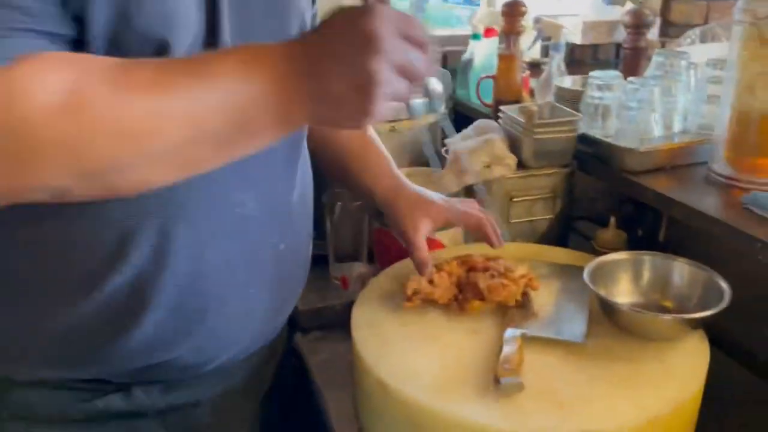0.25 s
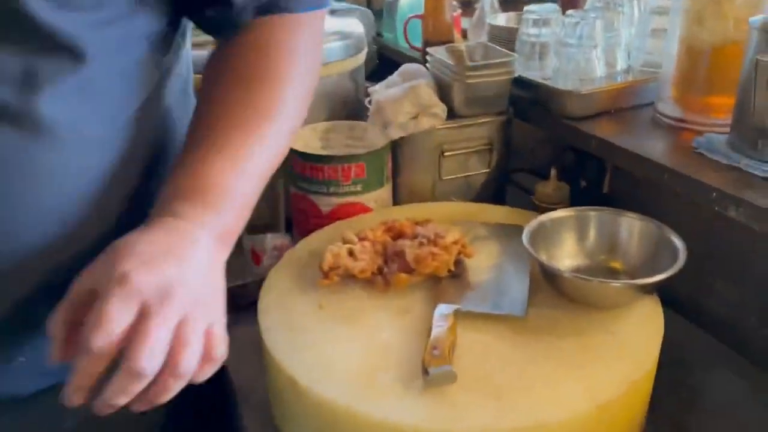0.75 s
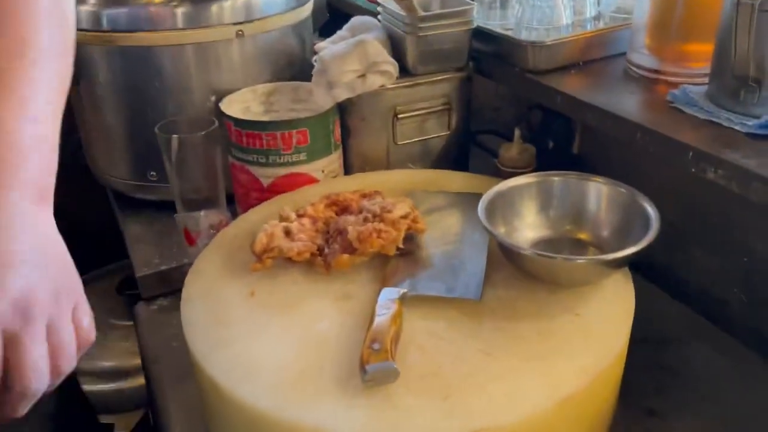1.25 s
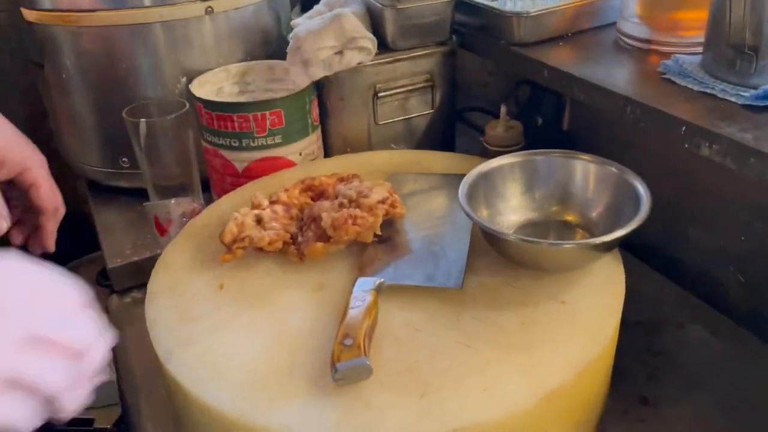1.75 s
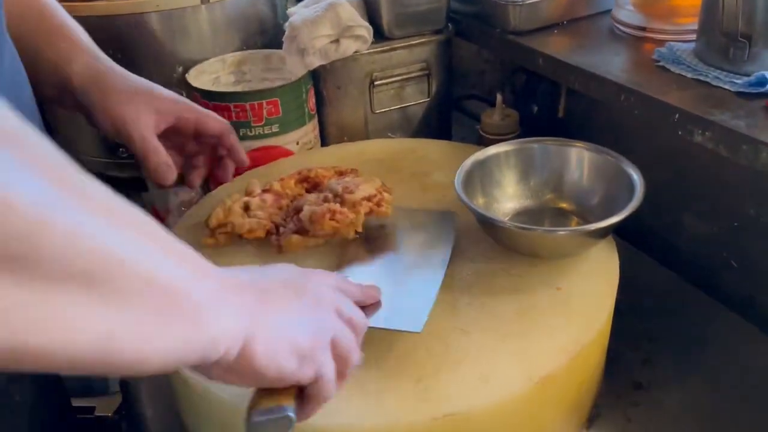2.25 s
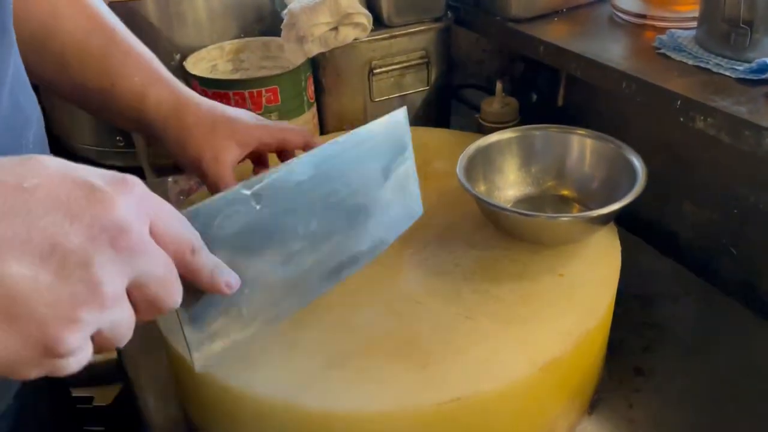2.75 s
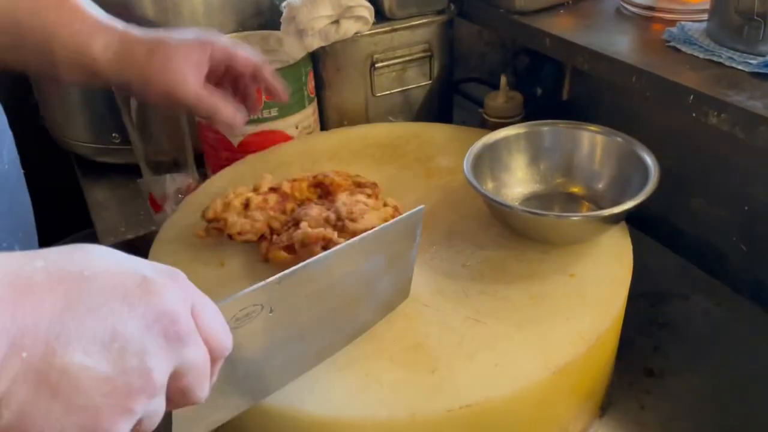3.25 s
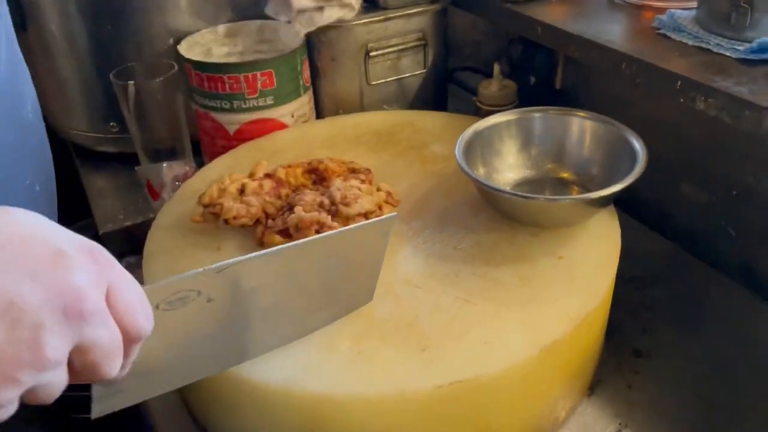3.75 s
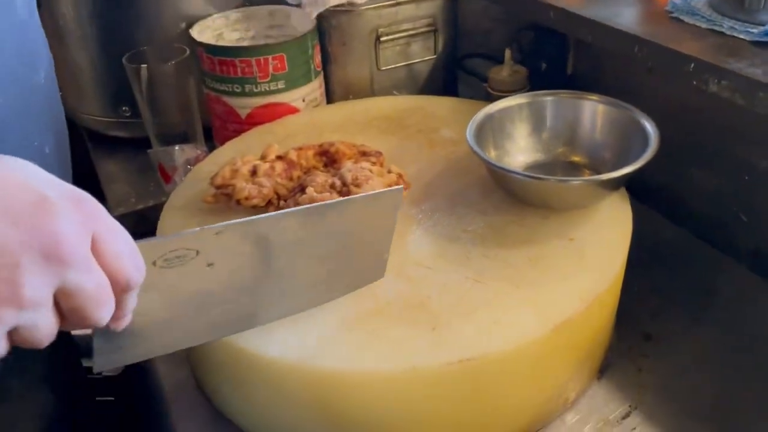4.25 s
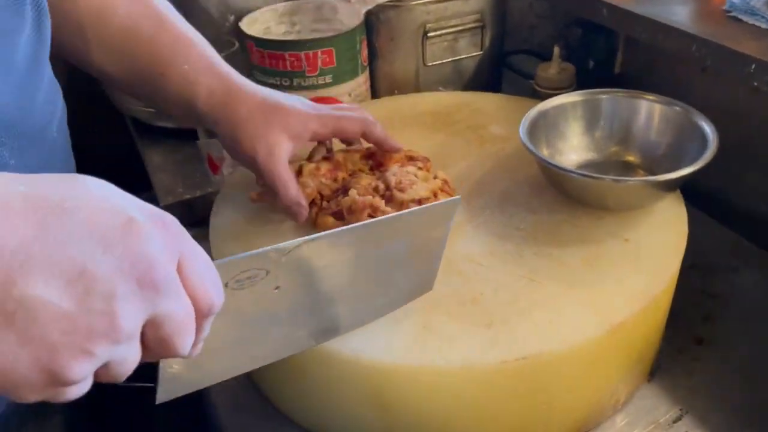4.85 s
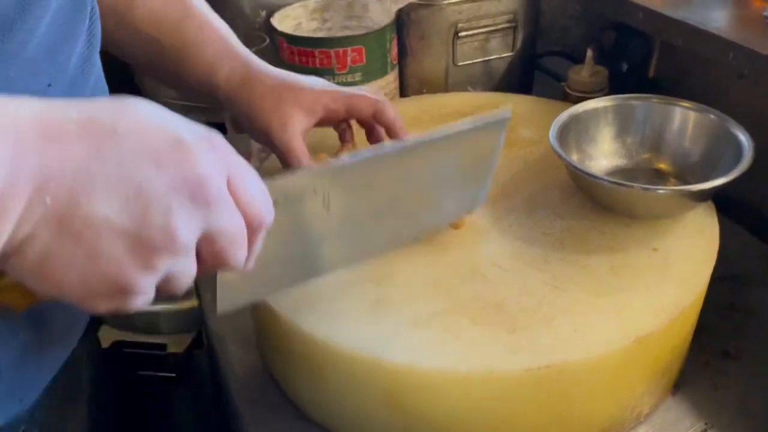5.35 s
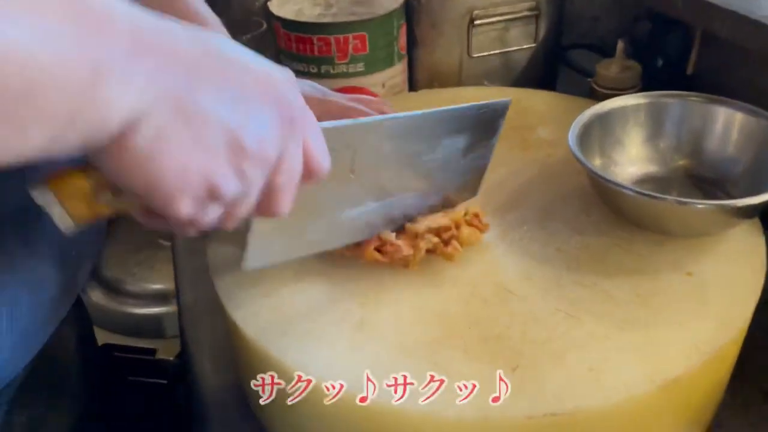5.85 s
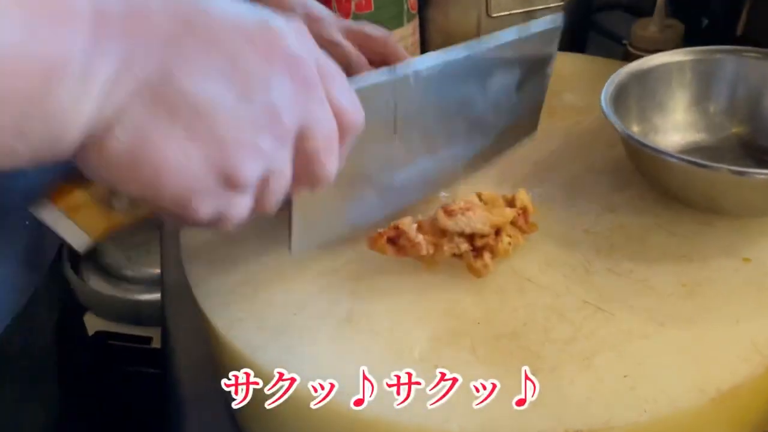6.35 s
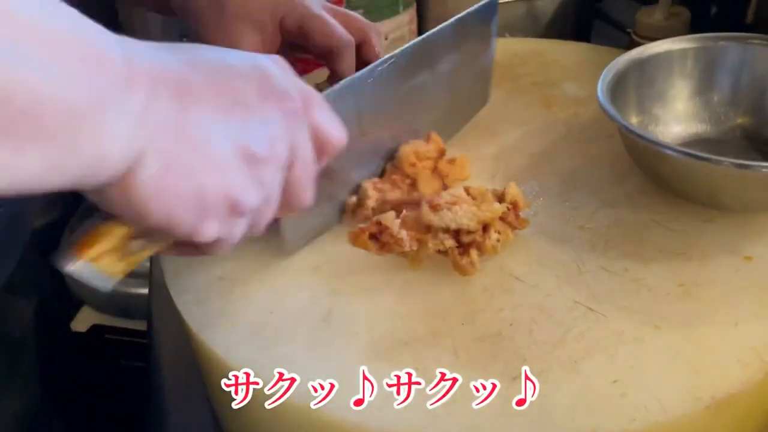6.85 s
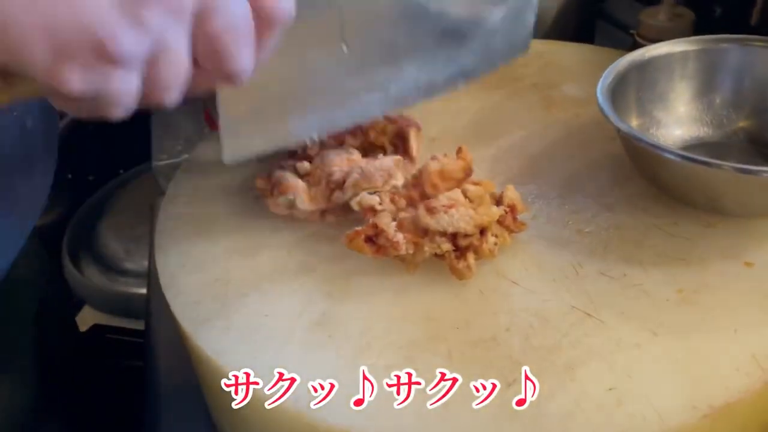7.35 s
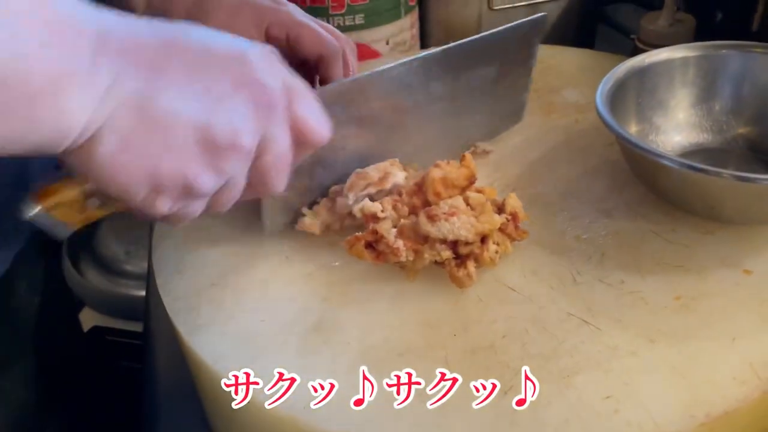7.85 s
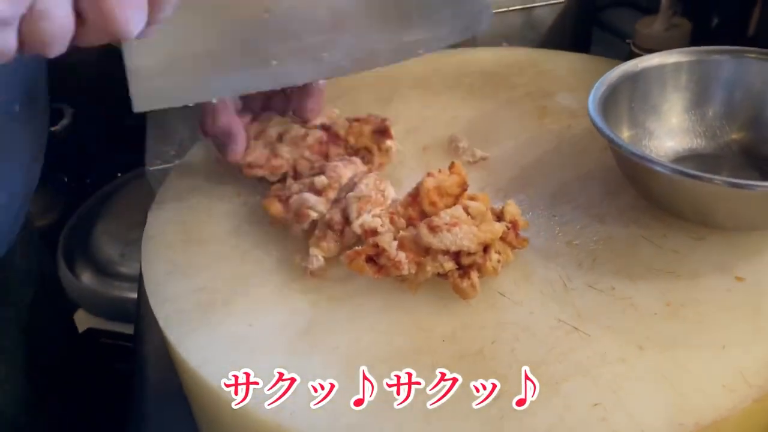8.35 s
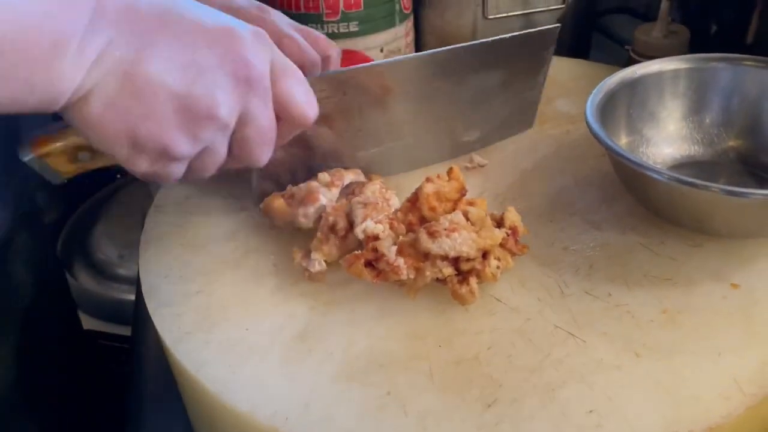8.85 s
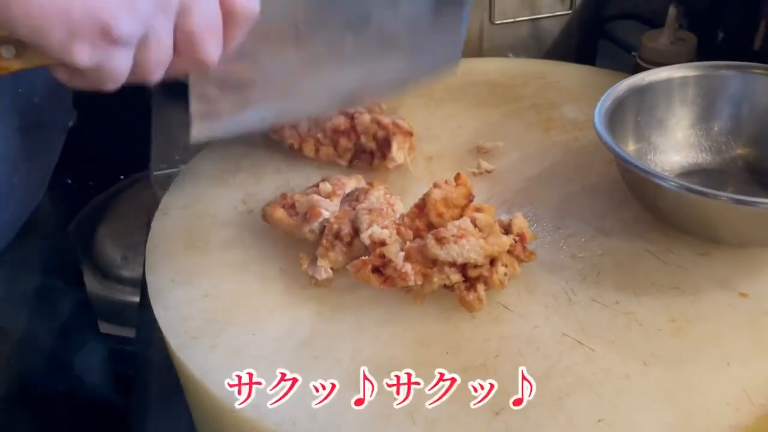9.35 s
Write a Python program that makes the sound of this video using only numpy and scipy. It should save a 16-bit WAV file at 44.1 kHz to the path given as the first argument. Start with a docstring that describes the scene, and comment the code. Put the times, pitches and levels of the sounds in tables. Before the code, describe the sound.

A heavy cleaver scrapes and rings, knocks a thick wooden block, then crunches five times through crisp fried chicken over a humming kitchen fan.

```python
"""A heavy cleaver slides ringing over a thick wooden block and taps it, twice firmly and then more softly.
It is laid on crisp fried chicken and pressed through five times: decaying modes and noise make the
blows, shaped grains of noise the crackling crust. In the kitchen behind, a fan hums (two wavering sines)
over rushing air, frying hiss (filtered noise) and far clatter. Two close microphone ports hear it all."""
import sys
import numpy as np
from scipy import signal
from scipy.fft import rfft, irfft
from scipy.io import wavfile
from scipy.ndimage import uniform_filter1d

SR = 44100
rng = np.random.default_rng(int(sys.argv[2]) if len(sys.argv) > 2 else 0)


def elevation(decibels):
    """Turn decibel levels (scalar or array-like) into linear amplitude ratios."""
    levels = np.asarray(decibels, float)
    return 10 ** (levels / 20)


def int16_out(signal):
    """Quantize to a 16-bit WAV file."""
    q = np.round(np.clip(np.atleast_2d(signal).T, -1, 1) * 32767)
    wavfile.write(sys.argv[1], SR, q.astype(np.int16))


N = 423360  # samples

# Close: cleaver knocks on the block, bare or through the meat
# [t/s, level/dB, contact/ms, steel ring re knock/dB]
KNOCKS = [(2.214, -29.5, 0.81, 20), (2.9194, -8, 0.13, -6), (3.132, -6, 0.16, -3.5), (3.146, -25.5, .15, 5),
          (4.271, -24, 0.11, -11), (5.1488, -23, 0.37, -8), (5.9051, -15, 0.57, -3),
          (5.9105, -21, 1.16, -4), (6.83, -17.5, 0.45, 0.5), (6.8336, -8, 0.76, -6), (7.789, -22, 1.2, -6),
          (8.717, -21, 1.03, -6), (9.367, -35, 0.81, 2)]
# Close: the free blade is touched and rings, most in the modes near f
# [t/s, ring level/dB, edge snap level/dB, contact/ms, f/Hz]
TOUCHES = [(2.192, -34, -45, 0.061, 6000), (2.198, -40, -40, .05, 13900), (2.2150, -15.5, -46, 0.55, 1440),
           (2.2582, -29, -36, 0.055, 7300), (2.262, -39, -45, 0.061, 11600),
           (2.3195, -20.5, -16, 0.042, 12500), (2.333, -29, -31, 0.054, 5600), (2.352, -22, -44, 0.2, 2330),
           (2.378, -32, -40, 0.08, 12300), (2.379, -30, -45, 0.13, 4900), (2.398, -33, -46, 0.12, 4760),
           (2.42, -43, -44, 0.065, 12300), (2.436, -36, -47, .06, 9330), (9.367, -23.5, -26, 0.31, 1450)]
# Modes of the block, of the steel resting on it, of the blade hanging free [f/Hz, relative level/dB, t60/s]
BLOCK_MODES = [(100.4, 0, 0.31), (141, -3.5, 0.14), (177, -7, 0.22), (239, 6, 0.12), (304, 5, 0.22),
               (381, -7, 0.3), (430, 2, 0.14), (470, 5, 0.13), (549, -5, 0.24), (602, -8, 0.15),
               (703, -8, 0.044), (1060, -3, 0.023), (1423, -1, 0.034), (2000, -5, 0.016)]
STEEL_MODES = [(784, -12, 0.11), (910, -2, 0.12), (1208, 3.5, 0.062), (1274, 9, 0.054), (1424, 1, 0.067),
               (2000, -14, .06), (2300, -15, .06), (3110, 4, 0.067), (3540, -1, 0.059), (3800, -13, .06),
               (4440, -16, .06), (4700, -7, 0.049)]
BLADE_MODES = [(1443, 2.5, 0.1), (1700, -4, 0.15), (2327, -11, .12), (2740, -5, 0.07), (3570, -6, 0.063),
               (4760, -9, 0.092), (5150, -6, 0.06), (5560, -10, 0.061), (6240, -6.5, 0.24),
               (6600, -11, .07), (7250, -10, .07), (7700, -5, .07), (9330, -10, 0.1), (10860, -10, 0.08),
               (11600, -14, .08), (12300, -8, 0.09), (12500, -3, 0.055), (13870, -6, .08),
               (14600, -10, .07), (15560, -8, .05)]
# Spectra of the dense wooden thud, the crack that opens a blow, the snap of the edge [f/Hz, level/dB]
THUD_COLOUR = [(30, -25), (60, -7), (150, 0.5), (400, -2.5), (800, -12), (1700, -20), (3500, -28),
               (6000, -40)]
CRACK_COLOUR = [(100, -20), (400, 2.5), (1300, 12.5), (2500, 5.5), (5000, -23), (8000, -28)]
SNAP_COLOUR = [(1000, 0.5), (4000, 1.5), (7000, 0), (9000, 15), (12000, -7), (16000, -1)]
BLADE_SPOT_DB = 3  # how much the blade modes differ from touch to touch
FAVOUR_DB, FAVOUR_OCTAVES = 10, 0.19  # lift of the modes near the touched f, and its reach
THUD_DB, THUD_T60_S = -0.5, 0.11  # t60 before damping
BLOW_HZ, BLOW_DB, BLOW_T60_S = 269, -7, 0.041  # first swing of the whole block, t60 before damping
MEAT_DAMPING = 0.54  # extra fall per ms of contact
CRACK_DB, CRACK_T60_S = 2, 0.019  # level before softening by contact
CRACK_RISE, CRACK_CONTACT = 0.74, 0.52  # both in contact times
SNAP_DB, SNAP_DB_PER_MS, SNAP_FALL_MS = -10.5, -36, 3.7  # re knock; weaker for longer contact; fall to 1/e

# Close: the edge is laid on the crust [t/s, level/dB, rise/s, hold/s, treble/dB]
LAYS = [(5.637, -21, 0.006, 0.011, 1.5), (6.558, -17, 0.0075, 0.0096, 4),
        (7.512, -16.5, 0.011, 0.0058, 3.5), (8.439, -24, 0.0038, 0.02, 6), (9.357, -25, 0.0062, 0.021, 10)]
# Close: the edge is pressed through the piece [t/s, level/dB, rise/s, hold/s, treble/dB]
PRESSES = [(5.822, -25.5, 0.06, 0.042, 1), (6.751, -25, 0.0034, 0.074, 7.5),
           (7.703, -24.5, 0.063, 0.017, 6.5), (8.665, -23.5, 0.026, 0.036, 3.5),
           (9.533, -35, 0.007, 0.046, 7)]
# Spectrum of breaking crust, also used for the rustles and drag [f/Hz, level/dB]
CRUST_COLOUR = [(150, -20), (500, 2), (1000, 1.5), (2200, 1), (4000, -2.5), (6500, -4.5), (7600, -0.5),
                (9000, 0.5), (10500, -6), (13000, -11), (16000, -10)]
LAY_T60_S, PRESS_T60_S = 0.017, 0.063
SETTLE_T60_S, SETTLE_DB = 0.16, -13  # the crust goes on settling, more quietly
CRUST_PATCHY_DB = 2  # each half octave of the crackle swells on its own

# Close: thick bits of crust crack at their own pitch [t/s, level/dB, f/Hz]
CHUNKS = [(5.849, -30, 4200), (5.8635, -19, 4250), (5.8723, -18, 2530), (5.874, -18, 4000),
          (5.882, -15, 2800), (5.8827, -16, 4000), (5.891, -22, 2700), (5.926, -23, 4100),
          (6.7605, -30, 4560), (6.764, -20, 6800), (6.786, -22, 3800), (6.799, -21, 2300),
          (6.807, -21, 2580), (6.823, -19, 6700), (7.7113, -28, 6800), (7.735, -27, 3600),
          (7.757, -22, 2520), (7.765, -26, 6300), (7.771, -18, 4800), (7.776, -14, 3380),
          (7.782, -28, 1480), (8.694, -26, 3540), (8.705, -27, 2500), (8.7255, -24, 4500)]
CHUNK_CYCLES = 5.6  # cycles to fade to 1/e
SMALL_CHUNK_DB, SMALL_LOW_HZ, SMALL_HIGH_HZ = -4, 1303, 7300  # highest level re the press; pitch range
# Close: clearest single flakes of crust snapping [t/s, level/dB]
FLAKES = [(5.646, -36), (5.7026, -32), (5.8135, -30), (5.872, -19), (6.095, -23.5), (6.4823, -30),
          (6.516, -25), (6.5633, -11), (6.7603, -31), (6.808, -24), (6.859, -26), (7.108, -27),
          (7.3216, -29), (7.508, -24), (7.5212, -19), (7.7345, -23), (7.9142, -22.5), (7.959, -28),
          (8.0647, -32), (8.2381, -27), (8.311, -24), (8.351, -21), (8.4, -24), (8.4435, -21),
          (8.4556, -12), (8.68, -23), (8.694, -22), (8.705, -17), (8.7255, -26), (8.981, -25), (9.241, -26),
          (9.27, -23), (9.3664, -17)]
# Thin flakes are brighter than the crust [f/Hz, level/dB]
FLAKE_TREBLE = [(3000, -3), (7000, 2), (11000, 2)]
FLAKE_T60_S, FAINT_FLAKE_DB = 0.032, -32

# The cleaver slides over the wood
DRAG_S, DRAG_DB, DRAG_HOLD_S, DRAG_T60_S = 2.18, -43, 0.2, 0.62
SCRAPE_DB, SCRAPE_PATCHY_DB = -24.5, 4  # each mode sings and falls silent on its own
# Out of sight: rustles, most of them bright [t/s, level/dB, t60/s, treble/dB, treble from f/Hz]
RUSTLES = [(.945, -40.5, 0.02, 16, 5030), (1.003, -23.5, 0.37, 6.5, 4970), (1.367, -43, 0.025, 13, 6500),
           (1.705, -48, .02, 12, 6500), (1.762, -45, .02, 14, 6000), (2.745, -50, 0.17, 18, 5030),
           (4.267, -17.5, 0.11, -11, 2700)]
RUSTLE_RISE_S, RUSTLE_HOLD_S = 0.0005, 0.0015

# Freshly cut chicken: spectrum of the sizzle [f/Hz, level/dB], then its course [t/s, level/dB]
SIZZLE_COLOUR = [(2000, -15), (4000, 0.5), (5500, -6), (6800, 4), (7800, 4), (9000, -1.5), (11000, -3.5),
                 (13500, 3), (16000, 0)]
SIZZLE_COURSE = [(5.64, -40), (5.78, -51), (5.9, -31), (6.0, -41.5), (6.35, -39.5), (6.58, -46),
                 (6.72, -39.5), (7.25, -48), (7.56, -48), (7.88, -39), (8.2, -39.5), (8.53, -36.5),
                 (8.87, -37), (9.1, -41), (9.45, -43), (9.6, -37)]
# Far: clearest clinks of pans and dishes; the row at 2.7 s is a light touch of the cleaver, ringing the same
# way [t/s, level/dB, f/Hz]
CLINKS = [(.059, -31.5, 3880), (0.238, -34.5, 3900), (0.4288, -35, 2000), (0.583, -31, 4060),
          (0.639, -27.5, 2505), (0.639, -33.5, 3830), (1.23, -35.5, 3030), (1.467, -31, 1716),
          (1.68, -30.5, 2000), (2.107, -30.5, 1740), (2.7, -28, 1724), (3.6802, -34, 3620),
          (3.8575, -34, 2540), (4.708, -36.5, 3870), (4.8313, -32.5, 2090), (6.095, -42, 2200),
          (6.135, -38, 1870), (6.176, -32.5, 3800), (9.2566, -32, 2680)]
CLINK_T60_S, FAINT_CLINK_DB, FAINT_LOW_HZ, FAINT_HIGH_HZ = 0.19, -39, 1650, 4400
CLINK_TICK, CLINK_TICK_S = 1, 0.0037  # clear start of a clink

# Fan: crest of its hum [t/s, blade tone level/dB, octave level/dB]
HUM_CREST = [(0.0, -22, -51), (0.4, -25.5, -30), (0.85, -22.5, -36), (0.99, -32, -25.5), (1.2, -27, -37.5),
             (2.38, -20.5, -28.5), (2.51, -30, -28.5), (3.77, -27.5, -35), (4.36, -24.5, -30),
             (4.41, -28.5, -44.5), (5.11, -23, -29), (5.48, -22.5, -36), (5.75, -29, -27.5),
             (6.71, -30.5, -45.5), (7.19, -23, -24.5), (7.27, -26, -49), (7.38, -27.5, -28),
             (9.41, -25.5, -34), (9.55, -25, -23.5), (9.6, -40, -52)]
HUM_HZ, HUM_DIP_DB, OCTAVE_DIP_DB = 66.57, 4, 2
HUM_LEFT_DB, HUM_RIGHT_LATE_S = 2, .0004  # left port over right port

# Spectra of the rumble, rushing air, far clatter and frying hiss [f/Hz, level/dB]
RUMBLE_COLOUR = [(20, -40), (45, -5.5), (60, -13.5), (100, 3), (170, -3), (260, -6), (400, -14.5),
                 (700, -32.5), (1500, -69)]
RUSH_COLOUR = [(80, -31), (300, -12.5), (450, 0.5), (700, -7), (1000, -8.5), (1500, -14), (2500, -21),
               (6000, -42)]
CLATTER_COLOUR = [(500, -7.5), (1500, 1.5), (2500, 1), (4000, -2), (5500, -12), (8000, -69)]
HISS_COLOUR = [(2000, -15), (4000, -8), (5500, -4.5), (6800, 3), (7800, 8), (9000, 5.5), (11000, -1.5),
               (13000, 1), (16000, 0.5)]
RUMBLE_DB, CLATTER_DB, HISS_DB = -29, -43, -50
RUSH_DB, RUSH_SHARE, RUSH_RISE_DB_PER_S = -34, 0.19, 0.2281
# Kitchen activity, followed fully by the clatter and in part by the rush [t/s, level/dB]
BUSY = [(0, 9), (.6, 3.5), (1.95, 3.5), (2.3, 5.5), (2.8, 3.5), (3.05, 5), (3.22, -1.5), (3.4, 3.5),
        (3.9, 3.5), (4.6, 1.5), (5.6, 0.5), (6.0, 6.5), (6.6, 0), (6.8, 6.5), (7.5, -0.5), (7.9, 3.5),
        (9.4, 0), (9.6, 2.5)]
# Far: the rush swells in a narrow band [middle t/s, length/s, centre f/Hz, level/dB]
SWELLS = [(3.693, 0.58, 650, -34), (4, 0.46, 633, -33), (6.0, 1, 875, -40), (9.007, 0.63, 901, -33),
          (9.191, 0.053, 910, -30)]
SWELL_WIDTH = 0.25  # share of the centre

# Ports: sound reaching each by its own path, re the shared sound [f/Hz, level/dB]
APART = [(60, -34), (130, -2.5), (300, 2), (700, 11), (1400, 6), (3000, 5.5), (6000, 8), (7600, -4.5),
         (8300, -12), (9800, -1.5), (11000, 1.5), (16000, -27)]
# Right port: phase lag of the shared sound behind the left [f/Hz, lag/rad]
PORT_LAG = [(0, .15), (430, 0), (700, .9), (1900, .1), (3100, 1.2), (4500, .7), (6400, -.6), (6750, -.6),
            (7700, -3), (10100, -3.3), (11200, -5), (11800, -6.1), (12800, -6.28), (17000, -6.28)]
# Right port: its response against the left [f/Hz, level/dB]
RIGHT = [(60, -2), (300, -3), (1500, -1.8), (5000, -.5), (8000, 0), (16000, 0)]
TAIL_T60_S, TAIL_DB = 0.094, -11  # room tail
WIDE_DB = -7  # sound bending round the housing
TOP_HZ = 15900


def blows():
    """The block rings, thuds and cracks, damped by the meat; the free blade rings on."""
    out, t = np.zeros(N), np.arange(SR // 2) / SR
    swing = elevation(BLOW_DB - 60 * t / BLOW_T60_S) * np.sin(2 * np.pi * BLOW_HZ * t)
    for s, db, contact_ms, steel_db in KNOCKS:
        thud = unit(colour(rng.standard_normal(len(t)), THUD_COLOUR)) * elevation(THUD_DB - 60 * t / THUD_T60_S)
        crack = unit(colour(rng.standard_normal(len(t)), CRACK_COLOUR))
        crack = crack * elevation(CRACK_DB - 60 * t / CRACK_T60_S)
        damping_db = 60 * t * MEAT_DAMPING * contact_ms / THUD_T60_S
        wood = (ring(BLOCK_MODES, t) + thud - swing) * elevation(db - damping_db)
        # a long contact damps the steel more strongly still
        steel = elevation(db + steel_db - damping_db * contact_ms) * ring(STEEL_MODES, t)
        strike(out, s, wood + steel, contact_ms)
        rise = np.minimum(t / (CRACK_RISE * contact_ms / 1000), 1)
        crack = elevation(db) * crack * rise / (1 + 2.3 * contact_ms)
        snap_db = db + SNAP_DB + SNAP_DB_PER_MS * contact_ms
        strike(out, s, crack, CRACK_CONTACT * contact_ms, snap_db)
    for s, db, snap_db, contact_ms, near_hz in TOUCHES:
        modes = []
        for hz, own_db, t60 in BLADE_MODES:
            nearness = np.exp(-(np.log2(hz / near_hz) / FAVOUR_OCTAVES) ** 2)
            modes.append((hz, own_db + FAVOUR_DB * nearness, t60))
        strike(out, s, elevation(db) * ring(modes, t, BLADE_SPOT_DB), contact_ms, snap_db)
    return out


def strike(out, s, body, contact_ms, snap_db=-np.inf):
    """A softer contact is a longer push and sounds duller; the edge snaps."""
    t = np.arange(400) / SR
    push = np.exp(-.5 * ((t * 1000 / contact_ms - 1) / 0.3) ** 2)
    add(out, s, np.convolve(body, push / push.sum()))
    snap = colour(rng.standard_normal(len(t)), SNAP_COLOUR) * np.exp(-t * 1000 / SNAP_FALL_MS)
    add(out, s, elevation(snap_db) * snap)


def ring(modes, t, spot_db=1.2):
    """All modes of a body struck once; each spot excites them a little differently."""
    hz, db, t60 = np.transpose(modes)[:, :, None]
    spread = np.array([spot_db, .004, .3])[:, None, None]  # level/dB, share of pitch, phase/rad
    level, detune, phase = rng.standard_normal((3, len(modes), 1)) * spread
    sign = (-1) ** np.arange(len(modes))[:, None]
    tones = np.sin(2 * np.pi * hz * (1 + detune) * t + phase)
    return np.sum(sign * elevation(db + level - 60 * t / t60) * tones, axis=0) / 3


def cuts(crust):
    """Crust breaks briefly as the edge is laid on, longer as it is pressed through."""
    crust = unit(swelling_bands(crust, 2, 1000, 8, CRUST_PATCHY_DB, 70))
    breaks = []
    for s, db, rise, hold, treble_db in LAYS:
        breaks.append((s, rise, hold, LAY_T60_S, db, treble_db))
        breaks.append((s, rise, hold, SETTLE_T60_S, db + SETTLE_DB, treble_db))
    for s, db, rise, hold, treble_db in PRESSES:
        breaks.append((s, rise, hold, PRESS_T60_S, db, treble_db))
    return bursts(breaks, crust)


def bursts(table, crackle, treble_hz=5000):
    """Crackle shaped by rise, hold and fall, its treble set apart; thinner flakes add treble."""
    out, t = np.zeros(N), np.arange(SR // 2) / SR
    high = colour(crackle, [(treble_hz, -40), (1.6 * treble_hz, 0)])
    low = crackle - high
    for s, rise, hold, t60, db, treble_db in table:
        shape = np.minimum(t / rise, 1) * elevation(db - 60 * np.maximum(t - rise - hold, 0) / t60)
        i = min(int(s * SR), N - len(t))
        add(out, s, shape * (low + elevation(treble_db) * high)[i:i + len(t)])
    return out


def chunks(count=16):
    """Thick crust cracks in short rough rings; smaller ones break at random under each press."""
    out, t = np.zeros(N), np.arange(600) / SR
    small = []
    for s, db, rise, hold, _ in PRESSES:
        for a, b, c in rng.random((count, 3)):
            when = s + a ** .6 * (rise + hold + PRESS_T60_S / 4)
            pitch = SMALL_LOW_HZ * (SMALL_HIGH_HZ / SMALL_LOW_HZ) ** c
            small.append((when, db + SMALL_CHUNK_DB - 9 * b, pitch))
    for s, db, hz in CHUNKS + small:
        rough = 1 + 1.7 * uniform_filter1d(rng.standard_normal(len(t)), size=20)
        add(out, s, elevation(db) * rough * np.sin(2 * np.pi * hz * t) * np.exp(-t * hz / CHUNK_CYCLES))
    return out


def flakes(count=14):
    """Brief snaps in a brightened crust colour; fainter ones at random once cutting has begun."""
    out, t = np.zeros(N), np.arange(1200) / SR
    start = LAYS[0][0]
    faint = [(start + a * (N / SR - start), FAINT_FLAKE_DB - 6 * b) for a, b in rng.random((count, 2))]
    for s, db in FLAKES + faint:
        add(out, s, rng.standard_normal(len(t)) * elevation(db - 60 * t / FLAKE_T60_S))
    return colour(colour(out, CRUST_COLOUR), FLAKE_TREBLE)


def singing(drag):
    """Dragging the cleaver over the wood keeps its modes singing, now one, now another."""
    t, i = np.arange(SR // 4) / SR, slice(int(DRAG_S * SR), int(DRAG_S * SR) + SR // 2)
    out = np.zeros(N)
    for mode in BLADE_MODES:
        drive = drag[i] * elevation(SCRAPE_PATCHY_DB * walk(25.1)[i])
        add(out, DRAG_S, signal.fftconvolve(drive, ring([mode], t)))
    return elevation(SCRAPE_DB) * out


def rustling(rustle):
    """Short bursts of dense grains out of sight, each with its own treble."""
    out = np.zeros(N)
    for s, db, t60, treble_db, hz in RUSTLES:
        out += bursts([(s, RUSTLE_RISE_S, RUSTLE_HOLD_S, t60, db, treble_db)], rustle, hz)
    return out


def sizzle():
    """Freshly cut chicken sizzles and ticks: noise and grains, silent before the first cut."""
    level = elevation(curves(SIZZLE_COURSE)[0]) * (np.arange(N) / SR > SIZZLE_COURSE[0][0])
    return level * air(lambda: noise() + 0.77 * grains(500, 2.4), SIZZLE_COLOUR, 1.8, 60)


def clinks(count=14):
    """Short noisy rings around one pitch each, blurred by distance; fainter ones fall at random."""
    out, t = np.zeros(N), np.arange(SR // 4) / SR
    faint = []
    for a, b, c in rng.random((count, 3)):
        pitch = FAINT_LOW_HZ * (FAINT_HIGH_HZ / FAINT_LOW_HZ) ** c
        faint.append((a * N / SR, FAINT_CLINK_DB - 4 * b, pitch))
    for s, db, hz in CLINKS + faint:
        blur = uniform_filter1d(uniform_filter1d(rng.standard_normal(len(t)), size=36), size=18)
        rough = 6 * blur + CLINK_TICK * np.exp(-t / CLINK_TICK_S)
        add(out, s, rough * np.sin(2 * np.pi * hz * t) * elevation(db - 60 * t / CLINK_T60_S))
    return out


def hum():
    """Fan blade tone and octave, wavering in phase and dipping at random below their crest."""
    t = 2 * np.pi * HUM_HZ * (np.arange(N) / SR - np.array([[0], [HUM_RIGHT_LATE_S]]))
    low_db, high_db = curves(HUM_CREST)
    low = elevation(low_db - HUM_DIP_DB * abs(walk(11))) * np.sin(t + 0.91 * walk(3.02))
    high = elevation(high_db - OCTAVE_DIP_DB * abs(walk(7.3))) * np.sin(2 * t + 1.79 * walk(6))
    return np.sqrt(2) * (low + high) * elevation(np.array([[.5], [-.5]]) * HUM_LEFT_DB)


def clatter():
    """Far clatter: noise in independently swelling bands that follows the kitchen activity."""
    return elevation(CLATTER_DB + curves(BUSY)[0]) * patchy(CLATTER_COLOUR, 1447.0, 2.2, 32, count=7)


def rush():
    """Rushing air: noise in swelling bands, slowly rising and partly following the activity."""
    db = RUSH_DB + RUSH_SHARE * curves(BUSY)[0] + RUSH_RISE_DB_PER_S * np.arange(N) / SR
    return elevation(db) * patchy(RUSH_COLOUR, 366.0, 0.93, 12, count=6)


def swells():
    """Far, narrow noise that rises and sinks back into the rush."""
    out, t = 0, np.arange(N) / SR
    for s, length, hz, db in SWELLS:
        band = [(hz * (1 + SWELL_WIDTH * k), -10 * k * k) for k in (-2, -1.86, 1, 3.0, 3.0)]
        shape = np.exp(-2 * ((t - s) / length * 2) ** 2)
        out = out + unit(colour(rng.standard_normal((2, N)), band)) * elevation(db) * shape
    return out


def hiss():
    """Frying hiss: steady noise sprinkled with grains."""
    return elevation(HISS_DB) * air(lambda: noise() + 0.5 * grains(300, 3.3), HISS_COLOUR, 0.31, 22.3)


def rumble():
    """Low rumble: flickering noise coloured towards the bass."""
    return elevation(RUMBLE_DB) * air(noise, RUMBLE_COLOUR, 0.82, 6.5)


def patchy(points, lo_hz, patchy_db, rate, count):
    """Noise at both ports in third-octave bands that each swell and fade on their own."""
    return unit(swelling_bands(air(noise, points, 0.94, rate), 3, lo_hz, count, patchy_db, rate))


def air(source, points, flicker_db, rate):
    """A steady source heard at both ports, its level flickering."""
    x = unit(colour(ports(source(), np.array([source(), source()])), points))
    return x * elevation(flicker_db * walk(rate))


def ports(shared, apart):
    """The shared sound reaches the right port shifted in phase; the rest differs left and right."""
    hz, lag = np.transpose(PORT_LAG)
    turn = np.exp(-1j * np.interp(np.arange(N // 2 + 1) * SR / N, hz, lag))
    late = irfft(rfft(shared) * turn, N)
    left, right = np.array([shared, late]) + colour(apart, APART)
    return np.array([left, colour(right, RIGHT)])


def swelling_bands(x, per_octave, lo_hz, count, patchy_db, rate):
    """Overlapping bands from lo_hz up, each at its own random level; the end bands take what lies beyond."""
    spectrum = rfft(x)
    band = np.clip(per_octave * np.log2(np.arange(1, N // 2 + 2) * SR / N / lo_hz), 0, count - 1)
    out = 0
    for k in range(count):
        out = out + irfft(spectrum * np.maximum(1 - abs(band - k), 0), N) * elevation(patchy_db * walk(rate))
    return out


def noise():
    """White noise for the whole length."""
    return rng.standard_normal(N)


def grains(per_s, spread_db):
    """Clicks at random moments, most small, some large."""
    hit = rng.random(N) < per_s / SR
    size_db = spread_db * np.minimum(rng.exponential(size=N), 3)
    return unit(hit * rng.standard_normal(N) * elevation(size_db))


def walk(rate):
    """Random levels, a new one every 1 / rate s, slewed twice."""
    k = int(SR / rate)
    steps = np.repeat(rng.standard_normal(N // k + 1), k)
    return 1.8 * uniform_filter1d(uniform_filter1d(steps, k), k)[:N]


def colour(x, points):
    """Filter by a spectrum of [f/Hz, level/dB]."""
    hz, db = np.transpose(points)
    f = np.arange(x.shape[-1] // 2 + 1) * SR / x.shape[-1] + 1
    return irfft(rfft(x) * elevation(np.interp(np.log(f), np.log(hz), db)), x.shape[-1])


def unit(x):
    """Scale to rms 1."""
    return x / np.sqrt(np.mean(x ** 2))


def curves(table):
    """Table columns after t/s, one value a sample."""
    s, *columns = np.transpose(table)
    return [np.interp(np.arange(N) / SR, s, c) for c in columns]


def add(out, s, x):
    """Mix x into out from time s."""
    i = int(s * SR)
    out[..., i:i + x.shape[-1]] += x[..., :max(N - i, 0)]


def scene():
    """Struck, broken and rustling sounds spread between the ports with a short room tail, over the kitchen."""
    crust = unit(colour(grains(6000, 2.2) + .6 * noise(), CRUST_COLOUR))
    crust = crust * elevation(1.8 * walk(300) + 1.5 * walk(80))
    rustle = unit(colour(grains(9000, 2.2) + .9 * noise(), CRUST_COLOUR))
    rustle = rustle * elevation(2.2 * walk(250) + 0.7 * walk(50))
    drag = bursts([(DRAG_S, .01, DRAG_HOLD_S, DRAG_T60_S, DRAG_DB, 0)], rustle)
    spread = blows() + cuts(crust) + chunks() + flakes() + drag + singing(drag) + rustling(rustle) + clinks()
    t = np.arange(SR // 2) / SR
    tail = rng.standard_normal((2, len(t))) * elevation(-60 * t / TAIL_T60_S) * (t > .006)
    tail = tail / np.linalg.norm(tail[0])
    room = elevation(TAIL_DB) * signal.fftconvolve(spread[None], tail, axes=1)[:, :N]
    # sound bending round the housing: a quarter cycle behind at one port, ahead at the other
    bent = elevation(WIDE_DB) * irfft(-1j * rfft(spread), N) * np.array([[1], [-1]])
    kitchen = sizzle() + hum() + clatter() + rush() + swells() + hiss() + rumble()
    return ports(spread, bent + room) + kitchen


def band_limit(x):
    """A steep low-pass at the top of the band."""
    return signal.sosfilt(signal.butter(12, 16650, fs=SR, output="sos"), x)


def record(dry):
    """The loudest peaks are rounded; the top is cut."""
    rounded = np.tanh(0.91 * dry) / 0.91
    low_pass = signal.ellip(6, .3, 30, TOP_HZ, fs=SR, output="sos")
    mix = signal.sosfilt(low_pass, rounded)
    return band_limit(mix)


dry = scene()
out = record(dry)
int16_out(out)
```